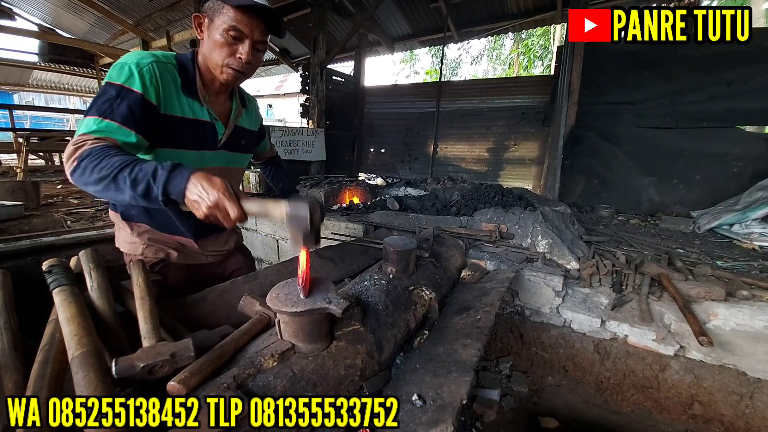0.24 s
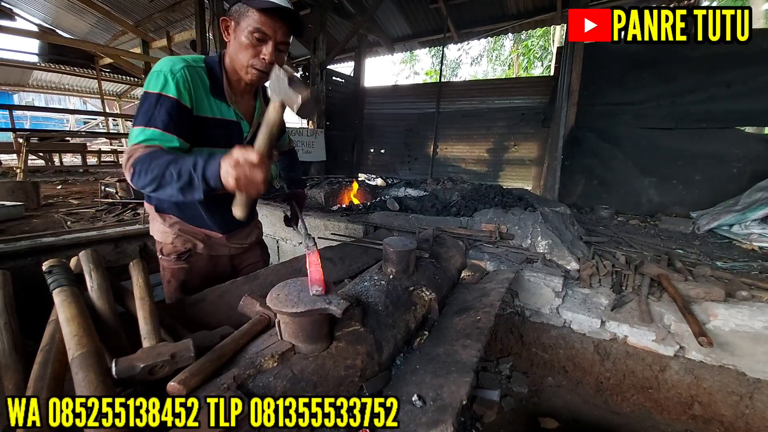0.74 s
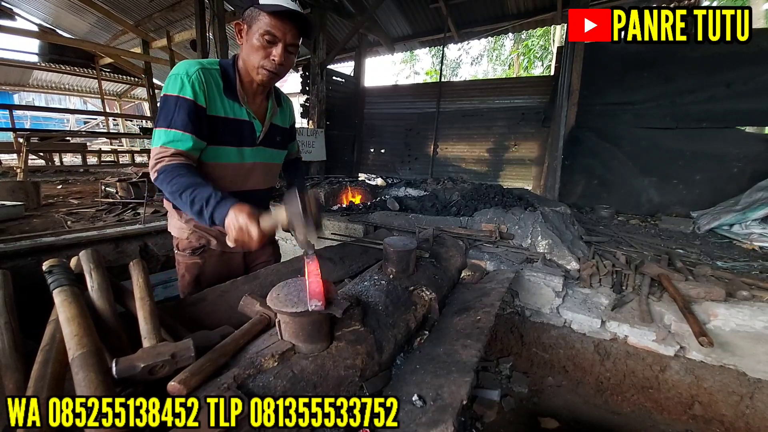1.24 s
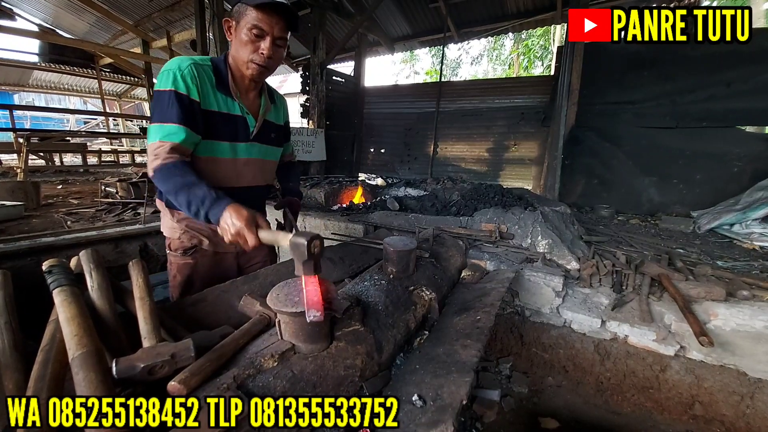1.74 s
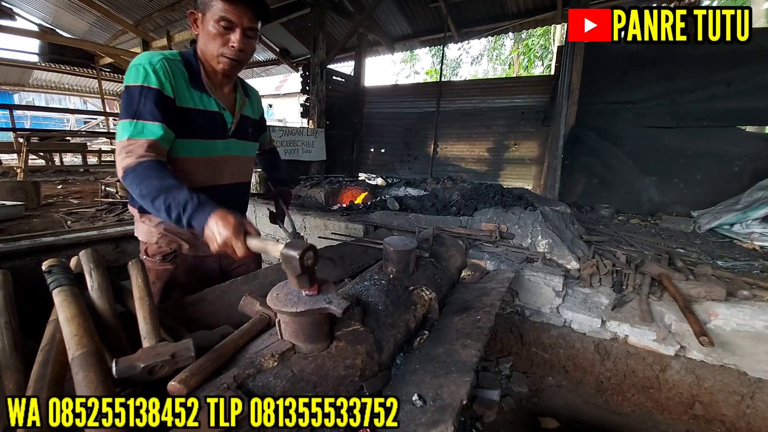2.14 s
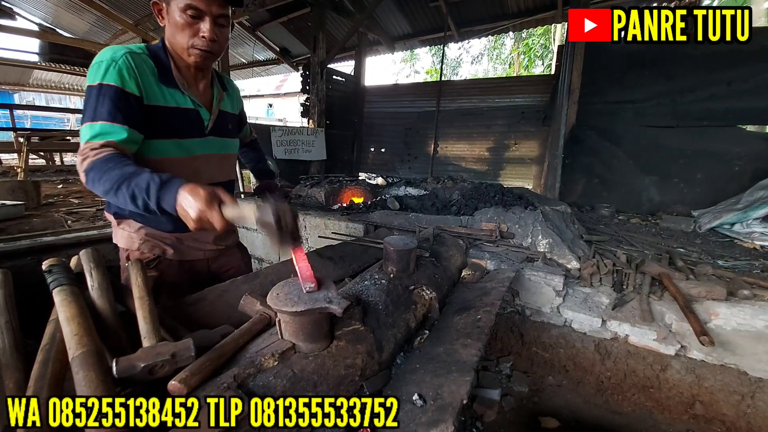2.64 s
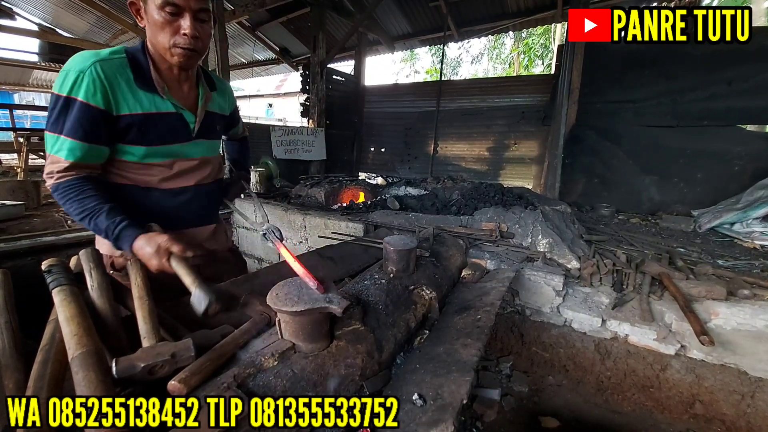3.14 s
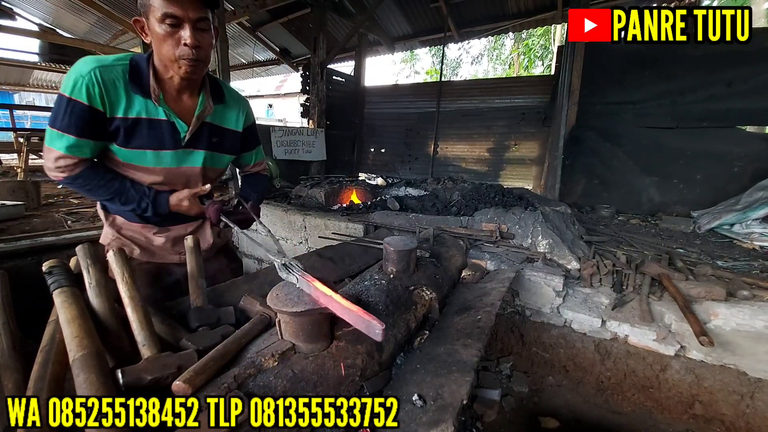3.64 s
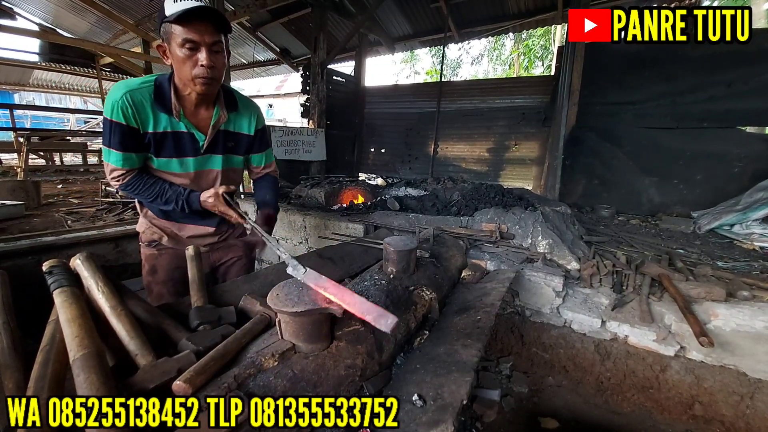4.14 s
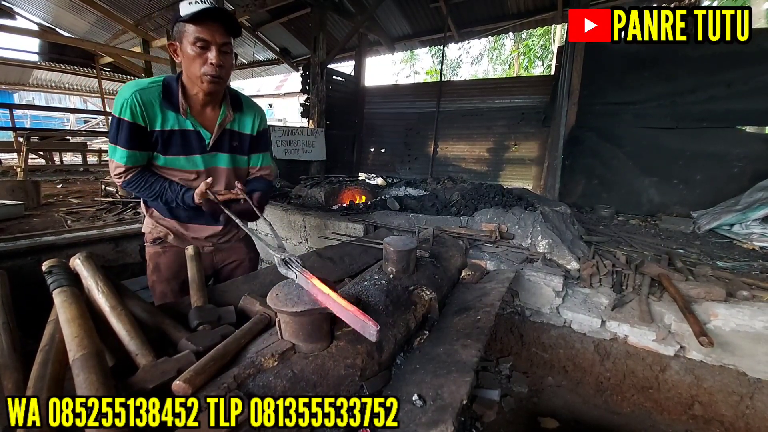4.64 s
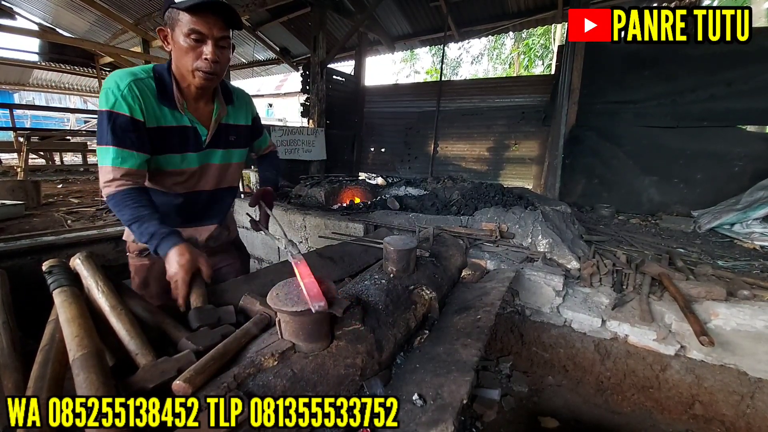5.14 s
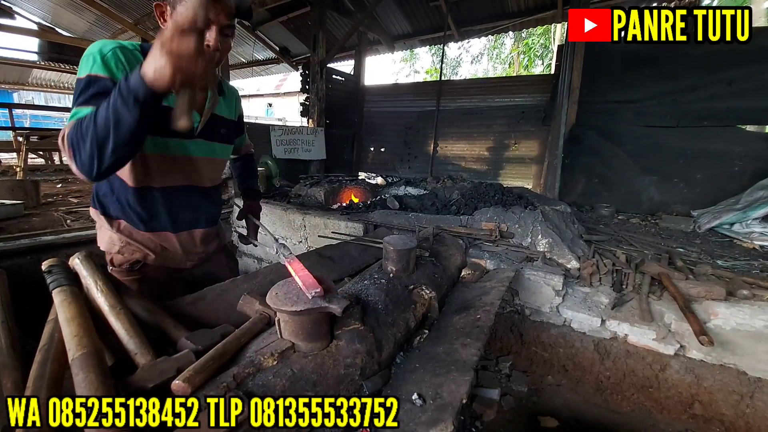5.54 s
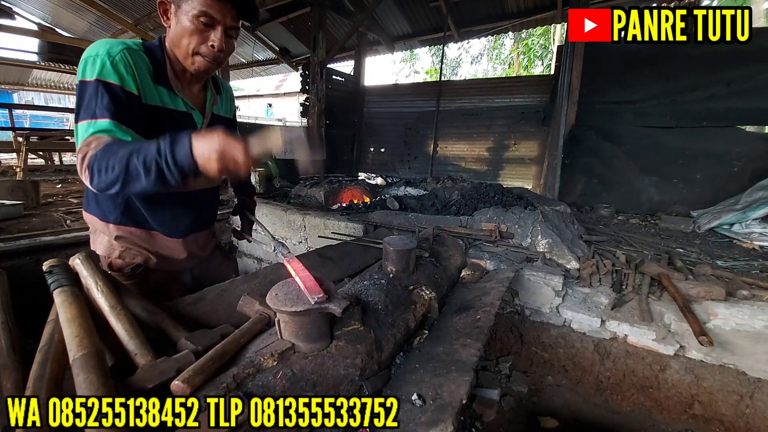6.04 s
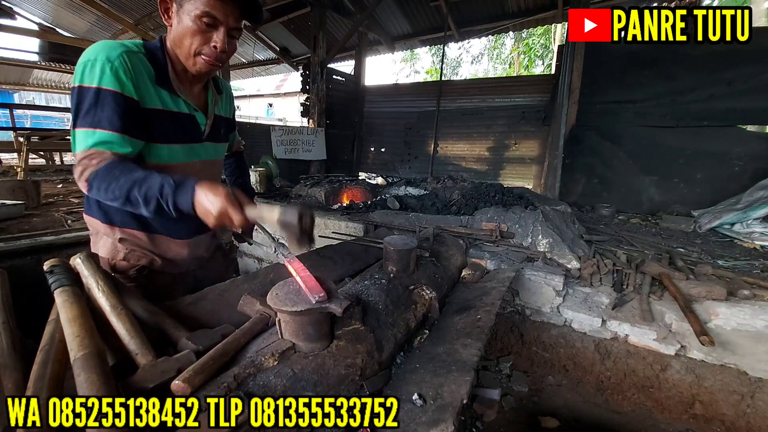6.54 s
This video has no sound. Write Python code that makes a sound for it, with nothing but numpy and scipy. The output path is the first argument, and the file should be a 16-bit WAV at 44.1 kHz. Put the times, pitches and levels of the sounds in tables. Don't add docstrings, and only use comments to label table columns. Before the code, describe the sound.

A hand hammer works hot iron on a stump-mounted anvil in an open-sided shed, heard close. A soft, deep blow lands at 0.4 s, then blows at 1.0, 1.4, 1.8, 2.2, 2.6 and 3.0 s, each a hard snap, woody thud and low push with a short clank; the 2.2 s one rings clearest. Faint gritty rubs and flake ticks fall between. At 3.3 s the hammer drops on the bench in a tight rattling clatter, with another dull knock at 3.6 s. Sparse, softer knocks and small tong clinks continue to 4.3 s, then near quiet. Gritty scraping swells around 5.0-5.3 s with ticks and light knocks. Two brighter blows follow at 5.96 s, with a longer open ring, and 6.54 s. A low blower hum near 150 Hz, stronger after 5 s, soft rumble, barely audible distant metal and slight hiss sit beneath.

```python
import sys
import numpy as np
from scipy import signal
from scipy.io import wavfile
from scipy.ndimage import uniform_filter1d

SR = 44100
rng = np.random.default_rng(int(sys.argv[2]) if len(sys.argv) > 2 else 0)


def master_out(mix):
    frames = np.transpose(np.atleast_2d(mix))
    ceiling = np.clip(frames, -1, 1)
    pcm = np.round(ceiling * 32767).astype(np.int16)
    wavfile.write(sys.argv[1], SR, pcm)


def gain_from_db(level_db):
    decades = np.asarray(level_db, float) / 20
    return 10 ** decades


N = 299880

# start in seconds, stump thud in dB, then ground push, face and crack in dB re the thud.
BLOWS = [
    (0.3971, -29.5, -2.5, -12, -5.5),
    (0.99, -19, -15, -3.5, -2.5),
    (1.4109, -21.5, -8.5, -1.5, -4),
    (1.8118, -21, -10.5, -8, -4),
    (2.2185, -22.5, -5.5, -1, -2),
    (2.6221, -19.5, -8.5, -5, -9),
    (3.021, -24, -7.5, -2, 0.1),
    (5.963, -17.5, -8.5, 1, 0.5),
    (6.5397, -23.5, 2, 6.5, 7.5),
]
PART_HZ = [70, 350, 1600, 7000]
# time in seconds, level in dB.
BLOWER_LOAD = [(0, -63.5), (.4, -59.5), (.75, -72), (1.2, -60), (3.0, -64.5), (3.4, -56.5), (3.9, -60),
               (4.7, -59), (5.1, -49), (5.38, -45), (5.95, -46), (6.25, -50), (6.8, -52.5)]
# frequency in Hz, width in Hz, level in dB.
PORTS = [(8200, 1300, -1), (11400, 1300, -8), (3950, 500, -17)]


def rms_one(x):
    return x / np.sqrt(np.mean(x ** 2) + 1e-20)


def in_time(rows):
    s, *columns = np.transpose(rows)
    return [np.interp(np.arange(N) / SR, s, c) for c in columns]


def at_hz(points, hz):
    point_hz, value = np.transpose(points)
    return np.interp(np.log(hz), np.log(point_hz), value)


def highpass(x, order, hz):
    return signal.sosfilt(signal.butter(order, hz, "high", fs=SR, output="sos"), x)


def drift(rate):
    r = np.exp(-80 * np.pi * rate / SR)
    slow = signal.lfilter([1], [1, -2 * r, r * r], rng.standard_normal(N // 40 + 2002))[2000:]
    return np.interp(np.arange(N) / 40, np.arange(len(slow)), rms_one(slow))


def ring(drive, hz, t60):
    r, w = gain_from_db(-60 / (t60 * SR)), 2 * np.pi * hz / SR
    return signal.lfilter([0, np.sin(w)], [1, -2 * r * np.cos(w), r * r], drive + 1e-18)


def fade(clicks, t60):
    return signal.lfilter([1], [1, -gain_from_db(-60 / (t60 * SR))], clicks + 1e-18)


def fed_ring(level_db, roughness, feed_s, noise, hz, t60):
    click = np.zeros(len(noise))
    click[0] = gain_from_db(level_db)
    return ring(click + roughness * fade(click, feed_s) * noise, hz, t60)


def bank(low_hz):
    white = rng.standard_normal((2, N))
    edges = np.geomspace(low_hz, 17000, round(3 * np.log2(17000 / low_hz)))
    for k, (low, high) in enumerate(zip(edges, edges[1:])):
        band = signal.butter(2, [low, high], "band", fs=SR, output="sos")
        yield np.sqrt(low * high), signal.sosfilt(band, white[k % 2])


def banded_noise(spectrum, patchy_db, rate):
    together = drift(rate / 3)
    out = 0
    for hz, noise in bank(22):
        flicker_db = patchy_db * (.6 * together + drift(rate))
        out = out + gain_from_db(at_hz(spectrum, hz) + flicker_db) * noise
    return rms_one(out)


def clicks_at(events, hz, extra_db, parts_hz=PART_HZ, lag_s=0):
    rows, out = np.array(events), np.zeros(N)
    part_db = [np.interp(np.log(hz), np.log(parts_hz), row[2:]) for row in rows]
    out[((rows[:, 0] + lag_s) * SR).astype(int)] = gain_from_db(rows[:, 1] + part_db + extra_db)
    return out


def impacts(events, colour, burst_db, burst_s, tail_db, echo_db, rise_s, t60_scale, lag_s=0):
    # frequency in Hz, t60 in seconds.
    shed_decay = [(60, 0.24), (160, 0.26), (420, 0.36), (1100, 0.32), (2910, 0.31), (7680, 0.23)]
    clumping, clump_cycles, roof_echo_s = 0.17, 18, .0125
    out = 0
    for hz, noise in bank(26.76):
        clicks = clicks_at(events, hz, at_hz(colour, hz), lag_s=lag_s)
        power = uniform_filter1d(noise ** 2, size=int(clump_cycles * SR / hz) + 40)
        noise = noise * (power + 1e-12) ** clumping
        soft = fade(clicks, 2.0 / hz + .0015)
        tail = fade(clicks, t60_scale * at_hz(shed_decay, hz)) - fade(clicks, rise_s)
        tail = tail + gain_from_db(echo_db) * np.roll(tail, int(roof_echo_s * SR))
        burst = fade(clicks, burst_s) - soft
        out = out + rms_one(noise) * (gain_from_db(tail_db) * tail + gain_from_db(burst_db) * burst)
    return out


def body(events, modes, level_db, spread_db, rattle_db, rattle_s, t60_scale, split, parts_hz=PART_HZ, lag_s=0):
    out, chance = 0, rng.normal(0, 1, (len(events), len(modes), 2))
    for k, (hz, mode_db, t60) in enumerate(modes):
        for side in (0, 1):
            strike_db = level_db + mode_db + spread_db * chance[:, k, side]
            clicks = clicks_at(events, hz, strike_db, parts_hz, lag_s)
            echoes = gain_from_db(rattle_db) * fade(clicks, rattle_s) * rng.standard_normal(N)
            side_hz = hz * (1 + split * (side - .5))
            out = out - ring(clicks + echoes, side_hz, min(t60, .45) * t60_scale)
    return out


def blow_parts(rows=BLOWS):
    return np.insert(np.array(rows, float), 3, 0, axis=1)


def aftermath(level_db, t60):
    return fade(clicks_at(blow_parts(), PART_HZ[1], level_db), t60)


def contacts():
    # start in seconds, thump in Hz (negative pushes first), thump level in dB,
    # thump length in cycles, snap level in dB.
    first_touches = [(.3984, 310, -8.5, 1.45, -21), (0.9914, 390, -3, 1.7, -8.5),
                     (1.4113, 400, -4.5, 1.7, -10.5), (1.8133, 400, -3.5, 1.7, -12.5),
                     (2.2193, 429, -8, 1.15, -4.5), (2.6238, 390, -3.5, 1.7, -15),
                     (3.0218, -125, -1.5, 0.66, -3), (3.2947, 420, -3.5, 1.9, -38),
                     (3.3629, 560, -6.5, 1.3, -45.5), (3.614, 440, -17, 1.8, -66),
                     (4.587, -75, -44, .8, -68), (5.9638, 485, -13, 1.6, -9), (6.5405, 425, -15, 1.2, -16)]
    thump_repeat_s, thump_repeat_db = 0.006335, -7.5
    out, t = np.zeros(N), np.arange(2048) / SR
    fizz = highpass(rng.standard_normal((len(first_touches), len(t))), 2, 3500.0)
    for (s, hz, thump_db, cycles, snap_db), noise in zip(first_touches, fizz):
        u = t * abs(hz) / (0.27 * cycles)
        thump = -np.sin(2 * np.pi * hz * t) * (u * np.exp(1 - u)) ** 2
        for bounce in (1, 2):
            thump = thump + gain_from_db(thump_repeat_db) * np.roll(thump, int(bounce * thump_repeat_s * SR)) / bounce
        snap_s = min(.0003 + .0003 * abs(snap_db + 5), .003)
        snap = 0.42 * noise * t / snap_s * 3 * np.exp(1 - 3 * t / snap_s)
        snap = snap + 0.36 * ring(snap, PORTS[0][0], 0.0021)
        out[int(s * SR):int(s * SR) + len(t)] += gain_from_db(thump_db) * thump + gain_from_db(snap_db) * snap
    return out


def hammer():
    # start in seconds, thud in dB, push, face and crack in dB re the thud.
    earlier_blow = (0, -31, -14, -15, -20)
    # frequency in Hz, level in dB.
    blow_colour = [(30, -19), (60, 0.5), (140, -6), (300, 0.5), (650, -3.5), (800, -10.5), (1500, -6.5),
                   (3000, -10), (6000, -10), (11000, -8), (15500, -11.5)]
    # mode in Hz, level in dB, t60 in seconds.
    stump_modes = [(150, 3, 0.32), (263, -14.5, 0.4), (320, -3.5, 0.94), (417, -15.5, .7),
                   (470.2, 0.5, 0.17), (520, -10.5, 0.8), (618.5, -5.5, 0.4), (660, -7, 0.47),
                   (800, -19, 0.059), (943, -14, 0.053), (1081, -12, 0.54), (1310, -21.5, 0.14),
                   (1380, -20, 0.064)]
    # mode in Hz, level in dB, t60 in seconds.
    ground_modes = [(65, 0.5, .3), (95, -2, 0.068)]
    # mode in Hz, level in dB, t60 in seconds.
    steel_modes = [(2693, -2, .26), (2765, 1, .07), (4030, -14, .1), (4365, -5, .23), (4300, -6, .14),
                   (4500, -2, .06), (4745, -9, .17), (5720, -16, .08), (7010, -22, .14), (8430, 1.5, .22),
                   (8350, 2, .04), (10800, -17, .12), (11400, -16, .1)]
    # start in seconds, strength in dB, waist, horn and head in dB.
    steel_strikes = [
        (.3985, -20, -39, -27, -32),
        (.9912, -14, -49.5, -29, -32),
        (1.411, -21.5, -36, -14.5, -20),
        (1.813, -18, -37, -26, -30),
        (2.2192, -24.5, -16, -18, -18),
        (2.623, -13.5, -27, -25, -34.5),
        (3.0222, -15.5, -31.5, -30, -28.5),
        (5.9635, -20.5, 0, 0, -6.5),
        (6.5402, -12, -14.5, -14.5, -13),
    ]
    steel_parts_hz = [2700, 4400, 8400]
    blows = blow_parts([earlier_blow] + BLOWS)
    scatter = impacts(blows, blow_colour, burst_db=-3.0, burst_s=0.02, tail_db=-12, echo_db=-1.5,
                      rise_s=0.0078, t60_scale=0.93)
    stump = body(blows, stump_modes, level_db=-10.0, spread_db=3.0, rattle_db=-24.0, rattle_s=.2,
                 t60_scale=0.51, split=.021, lag_s=.001)
    ground = 0
    for hz, mode_db, t60 in ground_modes:
        ground = ground + ring(clicks_at(blow_parts(), PART_HZ[0], mode_db, lag_s=0.0046), hz, t60)
    steel = body(steel_strikes, steel_modes[1:], level_db=-6.5, spread_db=1.5, rattle_db=-18, rattle_s=.19,
                 t60_scale=.56, split=0.0045, parts_hz=steel_parts_hz)
    return scatter + stump + ground + waist() + steel


def waist():
    # start in seconds, note in Hz, level in dB, level of the return in dB, t60 in seconds.
    waist_rings = [
        (.992, 2700, -52, -68, .25),
        (1.412, 2696, -42, -85, .2),
        (2.226, 2700, -33, -61, .24),
        (2.624, 2700, -41, -59, .23),
        (3.023, 2695, -46, -74, .22),
        (5.964, 2693, -34, -48, .31),
        (6.541, 2697, -40, -50, .22),
    ]
    far_wall_s, far_wall_spread_s = .125, .03
    out, noise = np.zeros(N + SR), rng.standard_normal((2, N))
    spread = np.hanning(int(far_wall_spread_s * SR))
    back = int(far_wall_s * SR) + np.arange(len(spread))
    for s, hz, level_db, return_db, t60 in waist_rings:
        start, click = int(s * SR), np.zeros(SR // 2)
        click[0] = gain_from_db(level_db)
        drive = click + .03 * fade(click, .14) * np.resize(noise[0, start:], len(click))
        returned = np.cos(2 * np.pi * hz * back / SR + np.pi * noise[1, start])
        drive[back] += gain_from_db(return_db) * 2 * spread / spread.sum() * returned
        out[start:start + len(click)] += ring(drive, hz, t60)
    return out[:N] * (1 + .25 * drift(25.0))


def favoured():
    # start in seconds, mode in Hz, level in dB.
    favoured_modes = [(.398, 476, -31), (.398, 1109, -48), (.398, 4002, -53), (.398, 4161, -52),
                      (.991, 304, -24), (.991, 471, -24), (.991, 614, -28), (.991, 1101, -28),
                      (.991, 1647, -38), (.991, 8718, -42), (1.411, 474, -23), (1.411, 611, -29),
                      (1.411, 1650, -39), (1.411, 1984, -42), (1.411, 4336, -40), (1.411, 8452, -40),
                      (1.813, 148, -24), (1.813, 474, -22), (1.813, 611, -29), (1.813, 700, -34),
                      (1.813, 1380, -35), (1.813, 3950, -42), (2.219, 301, -23), (2.219, 471, -26),
                      (2.219, 1101, -35), (2.219, 1445, -38), (2.219, 1647, -36), (2.219, 8366, -43),
                      (2.623, 301, -26), (2.623, 692, -30), (2.623, 810, -37), (2.623, 1096, -28),
                      (2.623, 1445, -38), (2.623, 1647, -36), (2.623, 1814, -37), (2.623, 4365, -46),
                      (3.022, 105, -17), (3.022, 611, -31), (3.022, 1093, -32), (3.022, 2178, -40),
                      (3.022, 4370, -42), (5.963, 300, -22), (5.963, 342, -19), (5.963, 1650, -30),
                      (5.963, 2315, -33), (5.963, 2931, -34), (5.963, 4861, -36), (5.963, 8430, -23),
                      (6.54, 380, -25), (6.54, 2188, -35), (6.54, 2603, -34), (6.54, 2810, -35),
                      (6.54, 4365, -34), (6.54, 4759, -34), (6.54, 8306, -36), (6.54, 8430, -28)]
    out = np.zeros(N + SR)
    noises = rng.standard_normal((len(favoured_modes), SR // 3))
    for (s, hz, level_db), noise in zip(favoured_modes, noises):
        start = int((s + .004) * SR)
        out[start:start + len(noise)] += fed_ring(level_db - 3.5, .05, .14, noise, hz, .15)
    return out[:N]


def knock_parts():
    # start in seconds, bench thud in dB, face and crack in dB re the thud.
    bench_knocks = [(3.2928, -8.5, 1.5, -21.5), (3.304, -21.5, 17.5, 2.5), (3.315, -38, 1, 2),
                    (3.327, -33, -6, -3), (3.35, -35.5, 2.5, 0), (3.377, -32, -2, -13.5),
                    (3.365, -10, -6.5, -26), (3.385, -31, 6.5, -2), (3.395, -27, 4, -15),
                    (3.41, -39.5, -5, -25), (3.431, -32, -5, -15), (3.439, -40, -5, -7),
                    (3.473, -31, -24, -32), (3.58, -37, -14, -9), (3.6127, -13.5, -11.5, -51),
                    (3.627, -36, -1.5, -29), (3.649, -48, -17, -32), (3.667, -31, -18, -25),
                    (3.741, -38, -0.5, -6), (3.844, -42, -10, -59), (3.874, -28, -26, -46.5),
                    (3.963, -42, -14, -47), (3.991, -39.5, -8, -66), (4.099, -35.5, -9, 2),
                    (4.122, -28.5, -6.5, -39.5), (4.2, -43, -27, -20), (4.293, -50.5, -34.5, -21),
                    (4.586, -47, -25, -24.5), (4.904, -43.5, -34, -23), (5.178, -37, -2, 4),
                    (5.254, -26.5, -3.5, -30), (5.325, -31, -17, -16), (5.354, -52, -20, -19)]
    push_db = -6.5
    return np.array([(s, thud_db, push_db, 0, face_db, crack_db) for s, thud_db, face_db, crack_db in bench_knocks])


def tools():
    # frequency in Hz, level in dB.
    knock_colour = [(30, -35), (60, -5), (200, 0.5), (500, -6.5), (1000, -5.5), (2500, -8.5), (5000, -12),
                    (9000, -14.5), (15500, -24.5)]
    # mode in Hz, level in dB, t60 in seconds.
    bench_modes = [(155, 0, .1), (320, -2, .1), (365, -3, .08), (430, -4, .07), (540, -3, .08),
                   (657, -6, .05), (955, -9, .06), (1230, -10, .05), (1590, -13, .05), (2170, -18, .05),
                   (2380, -17, .05)]
    # start in seconds, note in Hz, level in dB, t60 in seconds.
    tool_clinks = [(3.31, 14700, -55, .12), (3.305, 646, -20.5, 0.14), (3.309, 2440, -29.5, 0.066),
                   (3.306, 1226, -14.5, 0.055), (3.323, 4300, -35, 0.047), (3.322, 8380, -46, 0.066),
                   (3.31, 6900, -46, 0.078), (3.325, 370.5, -18, .2), (3.348, 9710, -61, 0.042),
                   (3.349, 3156, -46, 0.036), (3.372, 1602, -28, 0.085), (3.386, 955, -24, 0.078),
                   (3.396, 8520, -53.5, .07), (3.397, 1305, -32, 0.056), (3.397, 2770, -32.5, .05),
                   (3.426, 1313, -31, 0.075), (3.439, 5600, -47.5, 0.027), (3.44, 990, -31, 0.067),
                   (3.478, 664, -37, 0.076), (3.583, 240, -38.5, 0.068), (3.66, 306, -30, 0.11),
                   (3.69, 325, -43, 0.16), (3.669, 1900, -43, 0.026), (3.807, 320, -46.5, 0.1),
                   (3.872, 630, -46.5, 0.074), (3.889, 1260, -66, 0.19), (3.99, 650, -48.5, 0.073),
                   (3.294, 150, -28, 0.35), (4.189, 150, -40, .08), (3.746, 950, -47, 0.12),
                   (3.848, 950, -57, 0.15), (4.036, 1950, -68.5, 0.038), (4.102, 800, -36, 0.077),
                   (4.12, 846, -45, 0.13), (3.746, 800, -55, 0.2), (3.297, 2580, -26, 0.039),
                   (3.304, 412, -20.5, 0.057), (4.101, 990, -50, 0.062), (4.098, 1852, -43.5, 0.088),
                   (4.101, 3520, -60, 0.049), (4.124, 290, -45, 0.086), (4.239, 1940, -80, 0.11),
                   (4.296, 444, -55.5, 0.046), (5.245, 407, -41.5, 0.27), (5.25, 825, -45, 0.14),
                   (5.326, 666, -41.5, 0.091)]
    knock_lag_s, bench_soft_hz = .002, 2500
    bounces = (rng.random(N) < 230 / SR) * rng.exponential(1, N)
    rattle = 0.75 + .5 * uniform_filter1d(fade(bounces, 0.029), size=130)
    scatter = impacts(knock_parts(), knock_colour, burst_db=-20.5, burst_s=0.0061, tail_db=-24.5, echo_db=-7.5,
                      rise_s=0.008, t60_scale=0.86, lag_s=knock_lag_s)
    bench = body(knock_parts(), bench_modes, level_db=-18.5, spread_db=2.5, rattle_db=-21.5, rattle_s=0.18,
                 t60_scale=.8, split=0.094, lag_s=knock_lag_s)
    soft_contact = signal.butter(2, bench_soft_hz, fs=SR, output="sos")
    out = rattle * scatter + signal.sosfilt(soft_contact, bench)
    touch = np.hanning(9) / 4
    for (s, hz, level_db, t60), noise in zip(tool_clinks, rng.standard_normal((len(tool_clinks), SR // 3))):
        clink = fed_ring(level_db, .12, t60, noise, hz, t60 / 2)
        if hz < bench_soft_hz:
            clink = np.convolve(clink, touch, "same")
        out[int(s * SR):int(s * SR) + len(noise)] += clink
    return out


def strokes():
    # start in seconds, length in seconds, level at the start in dB, swell over the stroke in dB.
    rub_strokes = [(0.647, 0.16, -79, -1), (0.843, 0.13, -63.5, -10.5), (1.09, 0.29, -60.5, -1),
                   (1.557, 0.13, -63, -3.5), (1.89, 0.24, -58, 6.5), (2.294, 0.036, -51, -6.5),
                   (3.23, .06, -65.5, 1), (3.464, 0.29, -76, 2), (3.89, 0.011, -78, -11),
                   (4.782, 0.23, -92.5, 6), (5.011, 0.061, -59.5, -4), (5.14, 0.15, -51.5, 12.5),
                   (5.52, 0.57, -67, 0.5)]
    attack_db_per_s, release_db_per_s = 701, 189
    t, pressure = np.arange(N) / SR, 0
    for start, length, level_db, swell_db in rub_strokes:
        hold_db = level_db + swell_db * np.clip((t - start) / length, 0, 1)
        attack_db = attack_db_per_s * np.maximum(start - t, 0)
        release_db = release_db_per_s * np.maximum(t - start - length, 0)
        pressure = pressure + gain_from_db(hold_db - (attack_db + release_db))
    return pressure


def scrape():
    # frequency in Hz, density in dB per Hz.
    grit_colour = [(530, -29), (900, -11.5), (1160, -5.5), (1290, -7.5), (1690, -6), (3190, -9.5),
                   (5930, 4.5), (6930, -1.5), (8490, 1), (9790, -7.5), (15600, -0.5)]
    # start in seconds, peak in dB.
    scale_ticks = [(0.84, -35), (0.8694, -57), (0.933, -45), (1.5634, -37), (3.6875, -58), (3.889, -49),
                   (3.996, -57.5), (4.04, -54.5), (4.101, -46), (4.59, -47), (4.753, -67), (4.993, -47),
                   (5.017, -54.5), (5.114, -38), (5.1412, -32.5), (5.759, -46)]
    ticks = np.zeros(N)
    for s, peak_db in scale_ticks:
        ticks[int(s * SR)] = gain_from_db(peak_db - 11)
    snaps = (rng.random(N) < 400 / SR) * gain_from_db(3.8 * np.minimum(rng.exponential(1, N), 4))
    grain = 1 + 0.32 * fade(snaps, 0.0026)
    grit = rms_one(grain * banded_noise(grit_colour, patchy_db=1.2, rate=16.0))
    return (gain_from_db(-4.0) * strokes() + fade(ticks, 0.01)) * grit


def blower():
    # frequency in Hz, density in dB per Hz.
    rumble_colour = [(15, -47.5), (25, -17.5), (108, -8), (144, -10.5), (175, -17.5), (204, -17),
                     (312, -26), (450, -31.5), (589, -42), (636, -50), (1090, -57), (1270, -51),
                     (2500, -55.5), (3250, -90.5), (5500, -120)]
    hum_hz, hum_width_hz = 147.6, 29
    hum_db, = in_time(BLOWER_LOAD)
    tone = np.sin(2 * np.pi * np.cumsum(hum_hz + .8 * drift(2.4)) / SR)
    wavering = rms_one(ring(rng.standard_normal(N), hum_hz, 2.4 / hum_width_hz))
    hum = gain_from_db(hum_db + 3.5) * (0.92 * tone + .18 * wavering)
    rumble = gain_from_db(-55.5 + 0.34 * (hum_db - hum_db.mean()))
    rumble = rumble + aftermath(-26.5, 0.66)
    return hum + rumble * banded_noise(rumble_colour, patchy_db=3.0, rate=28.0)


def far_metal():
    # start in seconds, length in seconds, note in Hz, level in dB.
    far_rings = [(0.5, 0.14, 1390, -69), (.62, .14, 3250, -83), (0.62, 0.37, 1480, -79),
                 (0.91, 0.091, 3180, -78), (2.83, 0.19, 1560, -72), (4.8, 0.33, 1350, -72),
                 (4.85, 0.33, 1574, -76), (5.395, 0.55, 450, -66), (0.55, 0.43, 450, -74),
                 (5.527, 0.11, 1296, -73), (5.507, 0.21, 3915, -75), (5.513, 0.16, 3160, -75),
                 (0.627, .35, 3900, -83), (.64, .2, 4450, -84), (0.638, 0.18, 4980, -80),
                 (0.814, 0.065, 3390, -77), (0.12, 0.22, 1720, -80), (5.552, 0.47, 4950, -79),
                 (5.83, 0.12, 3950, -79), (5.87, .08, 2800, -80), (5.82, .13, 1530, -77),
                 (6.35, 0.11, 3225, -74), (6.36, .1, 3900, -84), (2.47, .13, 3150, -86),
                 (4.94, .08, 4000, -80), (4.2, .3, 1900, -84), (4.68, .12, 1350, -82),
                 (0.62, .1, 2200, -86), (1.2, .08, 1330, -76), (2.88, .12, 5200, -88),
                 (4.25, .25, 3900, -86), (6.15, .2, 4370, -82), (6.17, .15, 4740, -84),
                 (5.55, .3, 5500, -82), (5.6, .1, 830, -76), (3.55, .3, 4300, -84), (3.8, .25, 5600, -84)]
    out = np.zeros(N + SR)
    for (start, length, hz, level_db), noise in zip(far_rings, rng.standard_normal((len(far_rings), SR))):
        swell = np.sin(np.pi * np.clip(np.arange(SR) / SR / length, 0, 1) ** 0.32)
        out[int(start * SR):int(start * SR) + SR] += gain_from_db(level_db) * swell * rms_one(ring(noise, hz, .06))
    return out[:N]


def air():
    # frequency in Hz, density in dB per Hz.
    hiss_colour = [(410, -24), (700, -9), (1120, -4), (1260, -4), (1390, -12.5), (1930, -9.5), (3370, -20),
                   (5170, 2), (6710, -16), (8150, -1), (9650, -13.5), (11600, -13), (15600, -12)]
    ports = 0
    for hz, width, level_db in PORTS:
        t60 = 2.3 / width
        port = ring(ring(rng.standard_normal(N), hz, t60), hz, t60)
        ports = ports + gain_from_db(level_db + drift(3.3)) * rms_one(port)
    load_db, = in_time(BLOWER_LOAD)
    level = gain_from_db(-81.5 + 0.11 * (load_db - load_db.mean()))
    level = level + gain_from_db(-13) * np.minimum(strokes(), gain_from_db(-44.0))
    level = level + aftermath(-59, 0.68)
    return gain_from_db(3.0) * level * (ports + banded_noise(hiss_colour, patchy_db=8.0, rate=1.4))


def scene():
    forging = contacts() + hammer() + favoured()
    handling = tools() + scrape()
    background = blower() + far_metal() + air()
    return (forging + handling + background)[None]


def low_pass(x):
    return signal.sosfilt(signal.butter(12, 16810, fs=SR, output="sos"), x)


def record(dry):
    overload = .8
    bass_cut = highpass(dry, 4, 40.0)
    rounded = overload * np.tanh(bass_cut / overload)
    shelved = signal.sosfilt(signal.cheby2(8, 26.0, 15700, fs=SR, output="sos"), rounded)
    cut = signal.sosfilt(signal.cheby2(12, 60, 17200, fs=SR, output="sos"), shelved)
    return low_pass(cut)


dry = scene()
out = record(dry)
master_out(out)
```